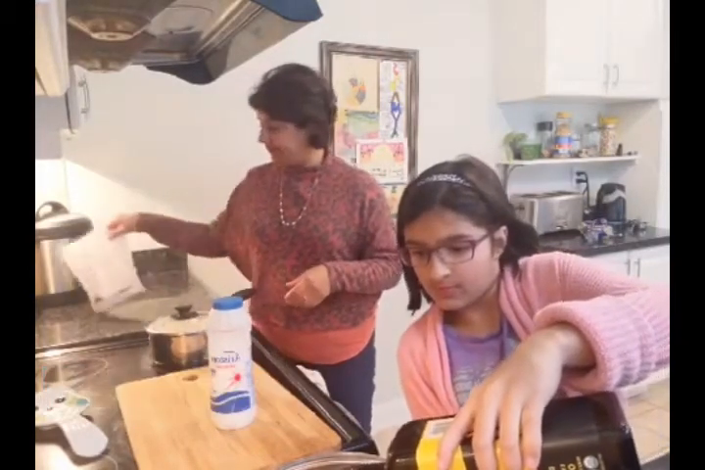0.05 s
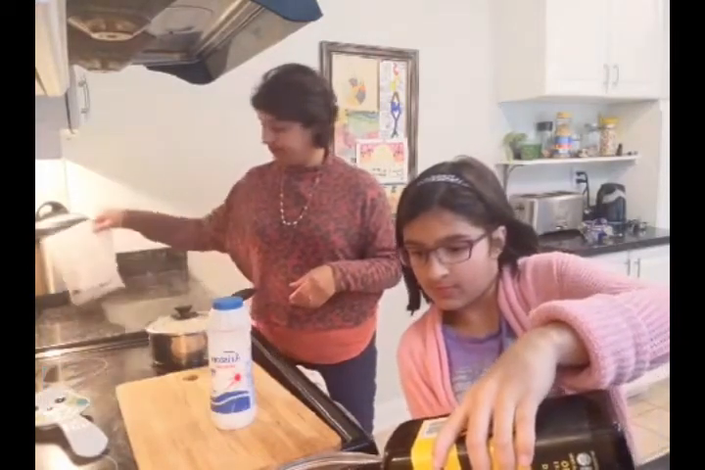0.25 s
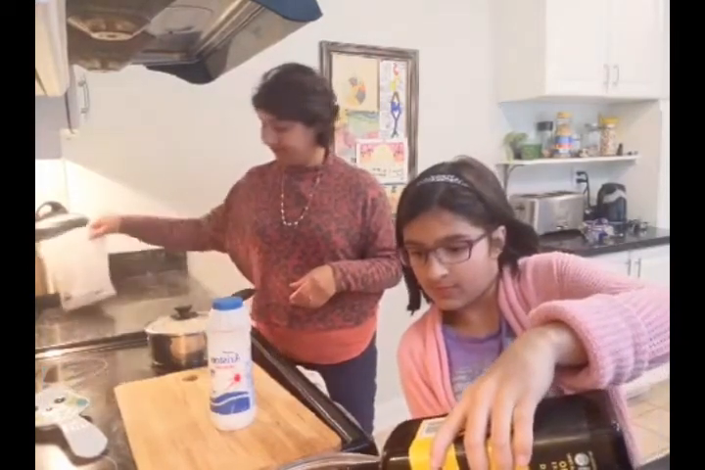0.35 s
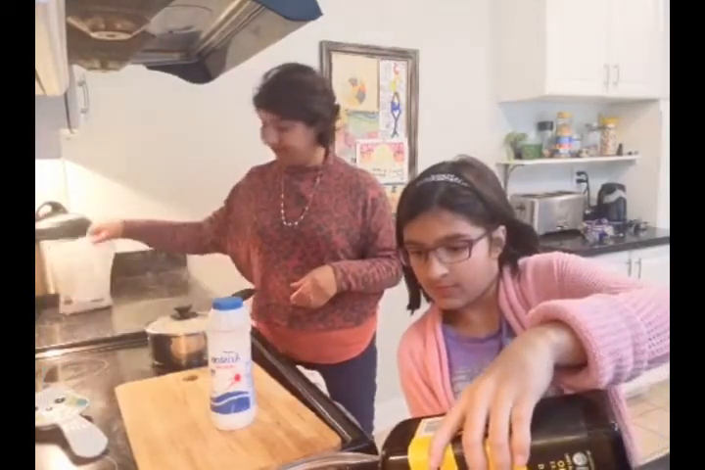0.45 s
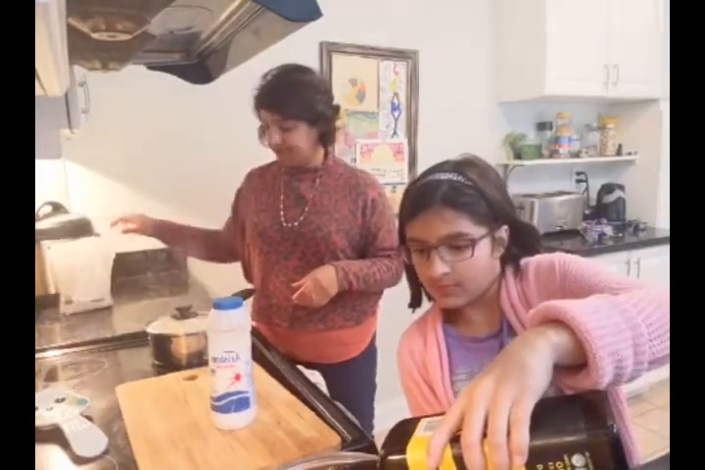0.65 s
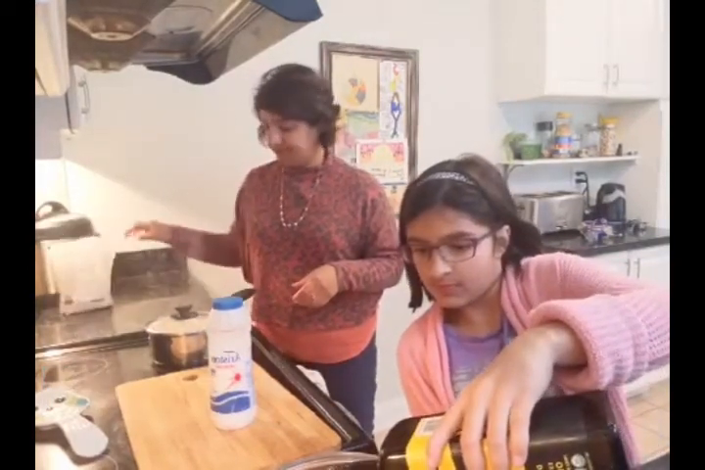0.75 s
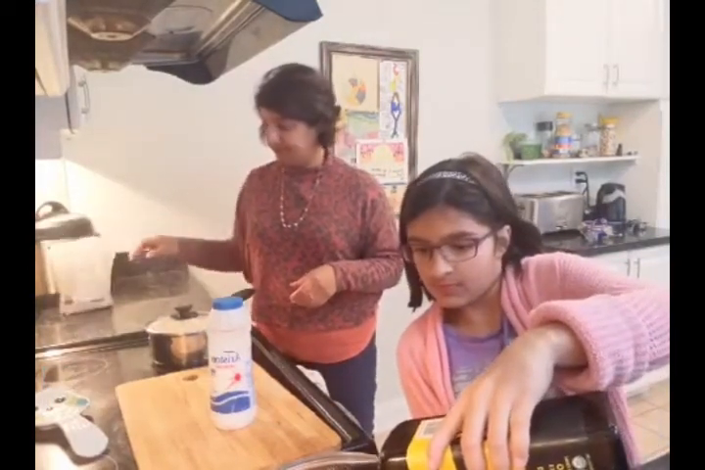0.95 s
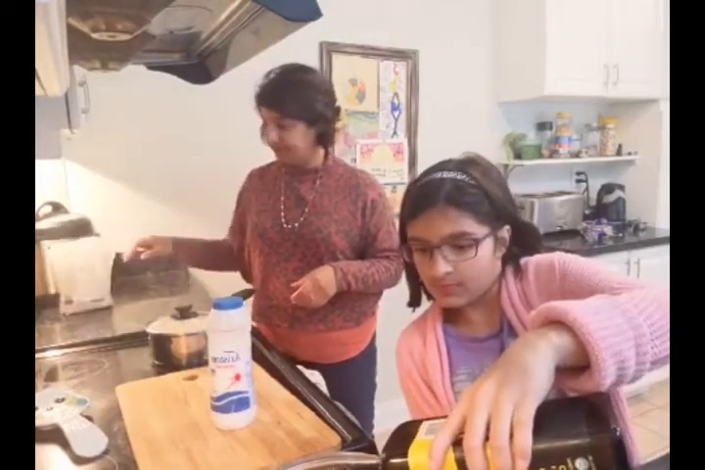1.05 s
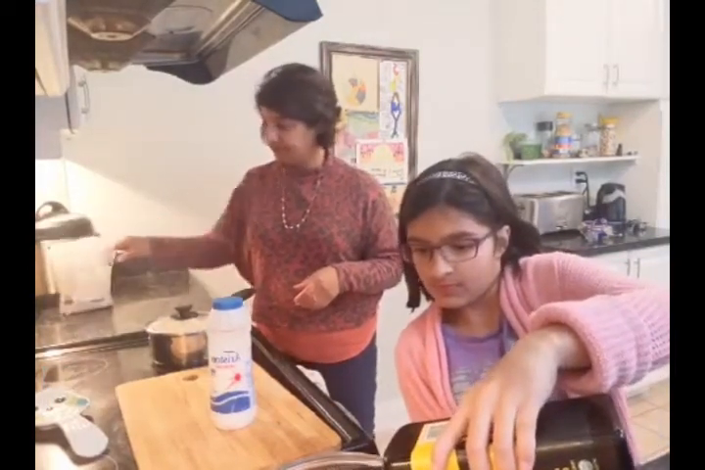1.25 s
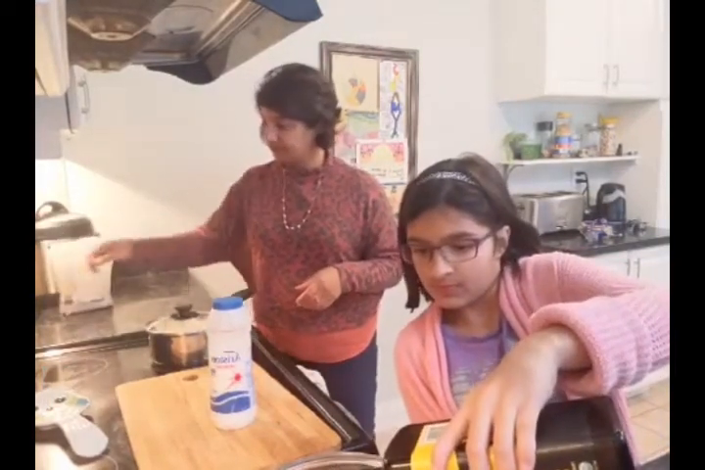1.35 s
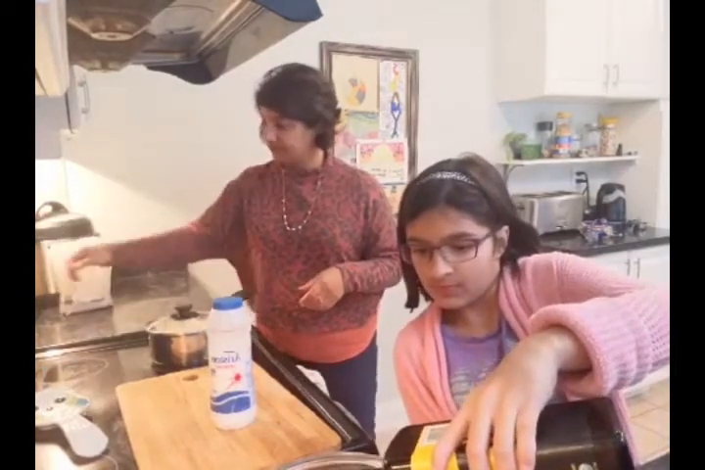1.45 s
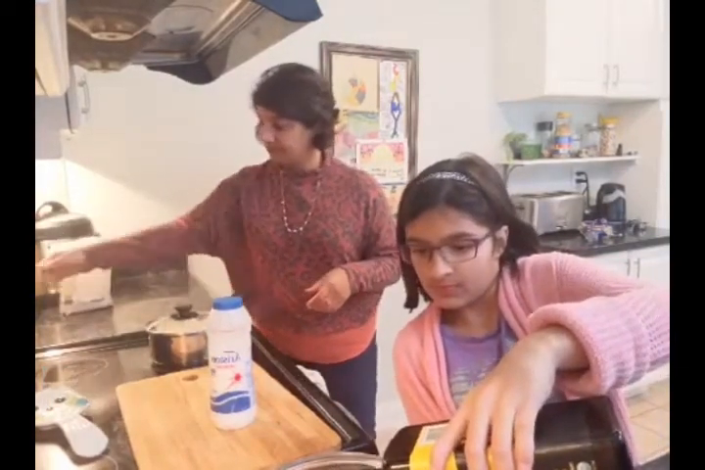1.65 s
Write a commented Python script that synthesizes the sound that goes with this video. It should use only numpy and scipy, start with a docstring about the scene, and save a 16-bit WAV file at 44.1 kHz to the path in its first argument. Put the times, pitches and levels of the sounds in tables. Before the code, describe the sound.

Corn kernels burst in a covered pan with sharp, hollow pops. The lid rattles after the first, two more follow, and a short lull leads to three quick ones. Faint metallic ticks fall between them, with a small kitchen's echo.

```python
"""Popcorn in a lidded saucepan

Each kernel bursts with a hollow crack that thumps the pan and rings its metal; flung kernels tick
against the wall. After the first pop loose metal, probably the lid, clatters.
A small kitchen echoes the blows over a quiet background."""
import sys
import numpy as np
from scipy import signal
from scipy.fft import rfft, irfft
from scipy.io import wavfile

SR = 44100
rng = np.random.default_rng(int(sys.argv[2]) if len(sys.argv) > 2 else 0)


def store_wav(level_fs):
    """Save 16-bit WAV to argv[1]."""
    pcm = np.round(np.clip(np.atleast_2d(level_fs), -1, 1) * 32767)
    wavfile.write(sys.argv[1], SR, pcm.T.astype(np.int16))


N = 74970
ATTACK_S, RING_RISE_S = 0.0003, 0.001


def amp(db):
    """Decibels to gain."""
    return 10 ** (np.asarray(db) / 20)


def curve(points, hz):
    """Interpolates (hz, value) points on a log-frequency axis."""
    points_hz, values = np.transpose(points)
    return np.interp(np.log(hz + 1), np.log(points_hz + 1), values)


def add(mix, start_s, sound):
    """Mixes a sound in at its start time."""
    part = mix[max(round(start_s * SR), 0):][:len(sound)]
    part += sound[:len(part)]


def low_cut(x, hz):
    """Second-order high-pass."""
    return signal.sosfilt(signal.butter(2, hz, "high", fs=SR, output="sos"), x)


def noise(colour, size):
    """Noise of rms 1 whose spectrum in dB is colour(hz)."""
    hz = np.fft.rfftfreq(size, 1 / SR)
    phases = np.exp(2j * np.pi * rng.random(len(hz)))
    x = irfft(amp(colour(hz)) * phases, size)
    return x / np.sqrt(np.mean(x ** 2) + 1e-20)


def treble(hz, tilt_db_per_octave, fizz_db):
    """Brightness in dB: a tilt above 3.5 kHz and a shelf of fizz above 8.3 kHz."""
    tilt = tilt_db_per_octave * np.log2(1 + (hz / 3500) ** 2) / 2
    return tilt + fizz_db * np.clip((hz - 8330) / 480, 0, 1)


def burst(colour, decay_s, rise_s=ATTACK_S):
    """A grainy puff of noise, trailed by its sound bouncing around under the lid."""
    grain_db, grain_s = 2.2, 0.0006
    echo_db, echo_decay_s = 0.5, 0.026
    t = np.arange(SR // 2) / SR
    flicker = np.interp(t / grain_s, np.arange(len(t)), rng.standard_normal(len(t)))
    fade = np.exp(-2 * t / decay_s)
    direct_power = fade * amp(grain_db * flicker) ** 2
    direct_power *= fade.sum() / direct_power.sum()
    echo_power = amp(echo_db) ** 2 * decay_s / echo_decay_s * np.exp(-2 * t / echo_decay_s)
    return noise(colour, len(t)) * np.sqrt(direct_power + echo_power) * (1 - np.exp(-t / rise_s))


def ring(modes, rise_s, tilt_db_per_octave=0):
    """A struck body: decaying sine modes, their levels relative to one another."""
    t = np.arange(SR * 3 // 4) / SR
    hz, level_db, t60_s = np.transpose(modes)[:, :, None]
    gain = amp(level_db + tilt_db_per_octave * np.log2(hz / hz.min()))
    waves = gain * np.sin(2 * np.pi * hz * t) * np.exp(-np.log(1000) * t / t60_s)
    return waves.sum(0) / np.sqrt(np.sum(gain ** 2) / 2) * (1 - np.exp(-t / rise_s))


def room_tone():
    """A quiet, steady bed of rumble and faint hiss."""
    # background spectrum: frequency_hz, relative_db
    spectrum = [(12, 0), (20, -1), (65, -6.5), (90, -7), (122, -5.5), (263, -12), (346, -13.5), (419, -8),
                (508, -16.5), (1790, -23), (1950, -26), (2230, -22.5), (14000, -36)]
    return amp(-65) * noise(lambda hz: curve(spectrum, hz), N)


def kernel_ticks():
    """Kernels and hulls tick or skid on the metal, ringing it without a thump."""
    # touches: start_s, level_db, centre_hz, half_width_octaves, rise_s, decay_s, ring_db, place (0-1)
    touches = [(.001, -64, 2580, 0.9, 0.00068, 0.007, -75, .5),
               (.014, -61.5, 450, 1.3, 0.00202, 0.011, -82, 0.97),
               (.0422, -47, 2400, .18, .0002, .002, -84, 1), (.043, -54, 900, .1, .0005, .005, -82, 1),
               (0.2913, -41, 8700, 0.3, 0.00015, 0.0016, -74, .5),
               (.349, -48, 5360, 0.18, 0.0028, 0.013, -58.5, 0.69),
               (0.484, -61.5, 3700, 1, 0.0028, .014, -77, 0.2),
               (0.646, -50.5, 2800, 3.4, 0.0053, 0.011, -87, 1),
               (0.673, -47.5, 1900, 0.71, 0.00112, 0.011, -56.5, 1),
               (0.7515, -52.5, 2690, 0.42, 0.0013, 0.011, -72, 0.65),
               (1.3184, -46.5, 2620, 1.8, 0.0053, 0.019, -49, 0.05),
               (1.403, -46, 5560, 1.3, .003, 0.014, -72, 0.4),
               (1.566, -63.5, 2470, 0.72, 0.0032, 0.009, -71.5, 1)]
    # the lid shading the top end: frequency_hz, gain_db
    lid_shade = [(7000, 0), (10500, -11.5), (14000, -9)]
    blows, metal = np.zeros((2, N))
    for start_s, level_db, centre_hz, half_width_octaves, rise_s, decay_s, ring_db, place in touches:
        def colour(hz):
            off_centre = np.log2((hz + 1) / centre_hz) / half_width_octaves
            return curve(lid_shade, hz) - 20 * np.log10(1 + off_centre ** 2)
        add(blows, start_s, amp(level_db) * burst(colour, decay_s, rise_s))
        add(metal, start_s + rise_s, amp(ring_db) * pan_wall(place))
    return np.array([blows, metal])


def pan_wall(place):
    """The pan's wall rings; each mode is loudest when struck at its sweet spot."""
    # wall modes: pitch_hz, level_db, t60_s, sweet_spot (0-1)
    modes = [(792, 0, .22, 1), (1290, -7, .15, .1), (1585, -3, .13, .35), (2388, 0, .22, .12),
             (2535, 0, .13, .45), (2566, 1, .2, .7), (2822, -1, .18, .75), (3550, -5, .13, .5),
             (3983, -2, .18, 0), (4066, 7.5, .28, .86), (4420, -4, .08, .3), (4705, -5, .16, 0),
             (5020, 0, .22, 0), (5580, -3, .13, .35), (6287, -5, .2, .75)]
    reach = 0.14  # a blow this far from the sweet spot gives half the amplitude
    t = np.arange(SR // 2) / SR
    hz, level_db, t60_s, sweet_spot = np.transpose(modes)[:, :, None]
    gain = amp(level_db) * rng.choice([-1, 1], hz.shape) / (1 + ((place - sweet_spot) / reach) ** 2)
    waves = gain * np.sin(2 * np.pi * hz * t) * np.exp(-np.log(1000) * t / t60_s)
    return waves.sum(0) * (1 - np.exp(-t / RING_RISE_S))


def hull_crack(tilt_db_per_octave, fizz_db):
    """The crack of a bursting hull, made hollow by the air under the lid."""
    # crack spectrum: frequency_hz, relative_db
    spectrum = [(100, -22), (400, -16), (650, -9.5), (1000, -9.5), (1600, -1.5), (2100, -8.5), (2800, -8),
                (4500, -6), (6500, 0.5), (8300, -2), (10300, -10), (14000, -9)]
    # air resonances under the lid: centre_hz, width_hz, boost_db
    cavity = [(1624, 440, 5), (2572, 215, 11.5), (3060, 500, 10), (4510, 450, 8.5), (5640, 2000, 4),
              (7200, 320, 0.5)]

    def colour(hz):
        hollow = sum(db / (1 + (2 * (hz - centre) / width) ** 2) for centre, width, db in cavity)
        return curve(spectrum, hz) + hollow + treble(hz, tilt_db_per_octave, fizz_db)
    return burst(colour, decay_s=0.005)


def kernel_pops():
    """A hull cracks with a brief pitched snap; the kick thumps the pan and rings its wall."""
    # bursting kernels: start_s, crack_db, tilt_db_per_octave, fizz_db, snap_hz, snap_db,
    # thump_db, thump_tilt_db_per_octave, ring_db, place (0-1)
    pops = [(0.2049, -36, 0, -2, 5800, -53, -36, -8, -49, 0.2),
            (0.3276, -41, -2.5, 3.5, 2660, -40.5, -36, -3.5, -68, 0.58),
            (0.655, -39.5, 1.5, 1.5, 7440, -44, -36, -1.5, -64, 0.01),
            (1.2221, -38, -1.5, -9.5, 6030, -45.5, -37, -4, -46.5, 0.38),
            (1.2691, -38.5, -9.5, 2.5, 4310, -37.5, -34.5, -4, -46, 0.43),
            (1.3915, -36, -1.5, -0.5, 2570, -34.5, -26.5, -0.5, -45, 0.69)]
    # the pan on its burner: pitch_hz, relative_db, t60_s
    thump_modes = [(112.6, -9, 0.16), (133.5, 1.5, 0.089), (164.7, -3, 0.11), (248, -3, 0.1),
                   (273.5, 1, 0.08), (348, -2, 0.11), (354.8, -17, 0.39), (474.4, -12, 0.12)]
    snap_t60_s, thump_rise_s = 0.014, 0.0043
    blows, metal = np.zeros((2, N))
    for start_s, crack_db, tilt, fizz_db, snap_hz, snap_db, thump_db, thump_tilt, ring_db, place in pops:
        snap = ring([(snap_hz, 0, snap_t60_s)], ATTACK_S)
        thump = low_cut(ring(thump_modes, thump_rise_s, thump_tilt), hz=75)
        add(blows, start_s, amp(crack_db) * hull_crack(tilt, fizz_db))
        add(blows, start_s, amp(snap_db) * snap)
        add(blows, start_s, amp(thump_db) * thump)
        add(metal, start_s, amp(ring_db) * pan_wall(place))
    return np.array([blows, metal])


def lid_clatter():
    """The lid knocks on the rim and rings; the stove top answers with a low thud."""
    # knocks: start_s, clank_db, tilt_db_per_octave, fizz_db, ring_db, thud_db
    knocks = [(0.2193, -33, 6.5, -3, -58, -81), (0.2407, -37, 8, 5, -42.5, -72),
              (.2455, -33.5, -1.5, 0, -41.5, -53), (0.2653, -46, -44, 0, -73, -44)]
    # clank spectrum: frequency_hz, relative_db
    spectrum = [(30, -28), (100, 2), (300, 5.5), (600, -4), (1100, 2.5), (2000, 0), (3000, 0), (4800, -3.5),
                (7000, -13), (10000, -22.5), (14000, -28)]
    # the ringing lid: pitch_hz, relative_db, t60_s
    lid_modes = [(470, -3, .2), (768, -6, .26), (901, 1, .3), (1067, 1.5, .32), (1303, -3, .26),
                 (1460, -4, .22), (2252, -5, .16), (2874, -4, .2), (2982, -2.5, .22), (3504, -1.5, .21),
                 (4126, -4, .15), (4512, -4, .18), (4838, -4, .18)]
    # the stove top: pitch_hz, relative_db, t60_s
    stove_modes = [(65.6, -1.5, 0.19), (57.5, -12, 0.94)]
    blows, metal = np.zeros((2, N))
    for start_s, clank_db, tilt, fizz_db, ring_db, thud_db in knocks:
        clank = burst(lambda hz: curve(spectrum, hz) + treble(hz, tilt, fizz_db), decay_s=0.011)
        add(blows, start_s, amp(clank_db) * clank)
        add(metal, start_s, amp(ring_db) * ring(lid_modes, RING_RISE_S))
        add(metal, start_s, amp(thud_db) * ring(stove_modes, rise_s=0.011))
    return np.array([blows, metal])


def kitchen_echo(blows):
    """Dense random reflections, each band dying at its own speed."""
    # reverb bands: centre_hz, level_db, t60_s
    bands = [(104, -17.5, 0.71), (297, -6, 0.43), (830, -2, 0.55), (2000, -7, 0.53), (4000, -5.5, 0.4),
             (7140, -13, 0.53), (12300, -27.5, 0.37)]
    predelay_s, size = 0.007, SR * 3 // 4
    t, hz = np.arange(size) / SR, np.fft.rfftfreq(size, 1 / SR)
    white_spectrum = rfft(noise(np.zeros_like, size))
    centres_hz = [band[0] for band in bands]
    tail, echo = np.zeros(size), np.zeros(N)
    for solo, (_, level_db, t60_s) in zip(np.eye(len(bands)), bands):
        band_gain = curve(list(zip(centres_hz, solo)), hz)
        reflections = irfft(white_spectrum * band_gain, size)
        fade = np.exp(-np.log(1000) * t / t60_s)
        tail += amp(level_db) * reflections * fade / np.linalg.norm(fade)
    add(echo, predelay_s, signal.fftconvolve(blows, tail))
    return echo


def scene():
    """Mono mix: the blows with their echo, the ringing metal left dry, and room tone."""
    blows, metal = kernel_pops() + kernel_ticks() + lid_clatter()
    return (blows + kitchen_echo(blows) + metal + room_tone())[None]


def record(dry):
    """The microphone's bass roll-off and a steep cut of the highest treble."""
    low_hz, high_hz = 34.6, 14250
    low_pass = signal.firwin(401, high_hz, window=("kaiser", 8), fs=SR)
    return signal.oaconvolve(low_cut(dry, low_hz), low_pass[None], "same")


dry = scene()
out = record(dry)
store_wav(out)
```